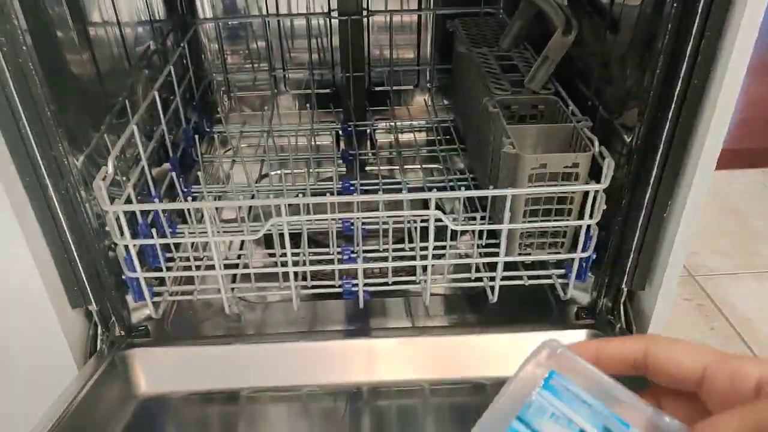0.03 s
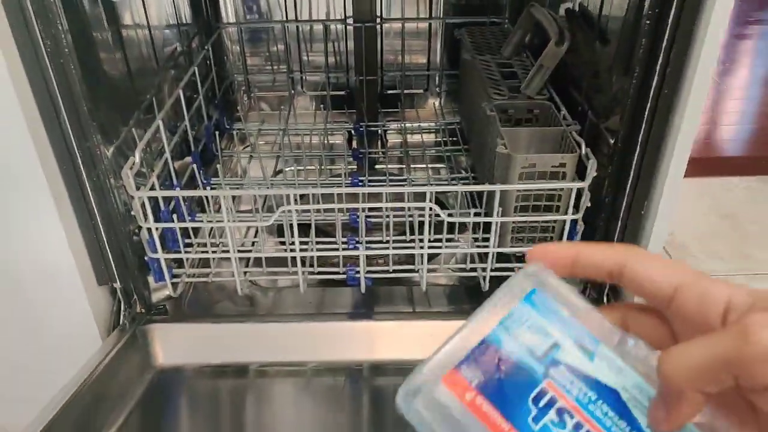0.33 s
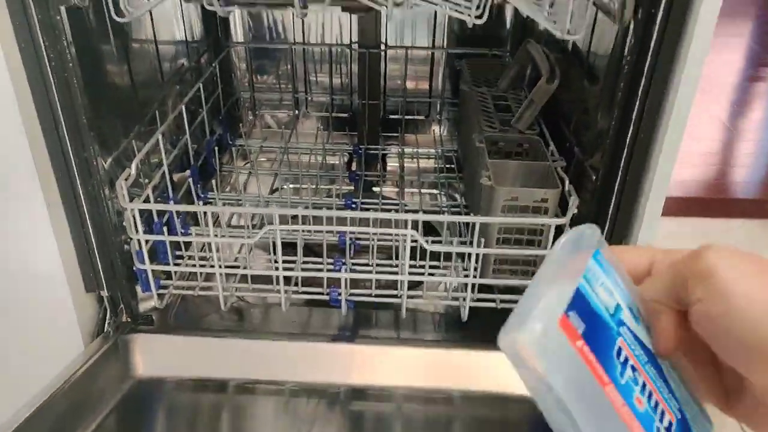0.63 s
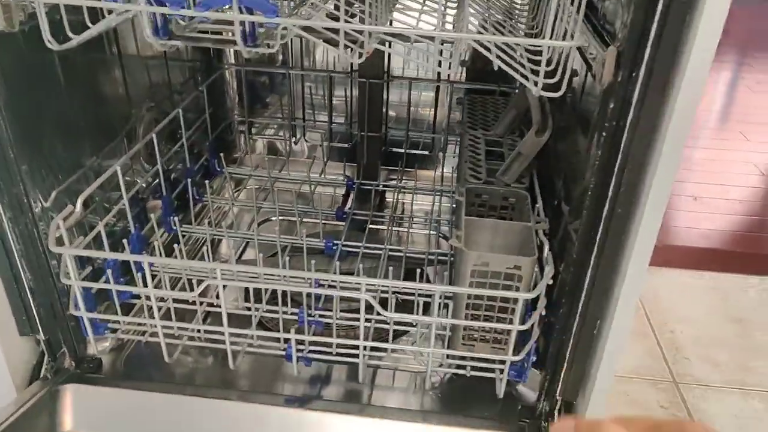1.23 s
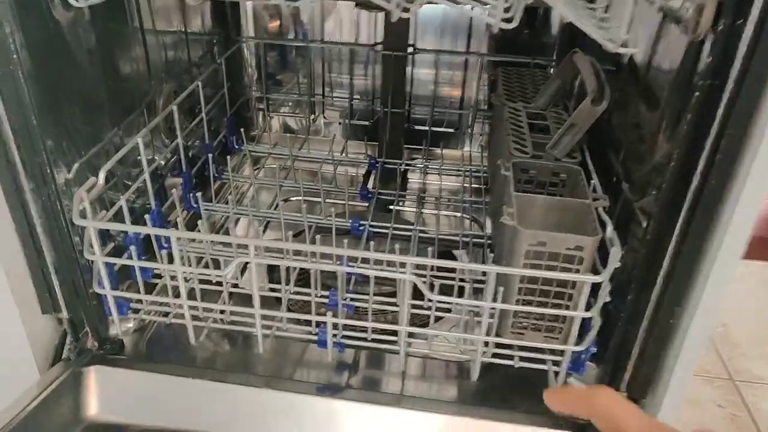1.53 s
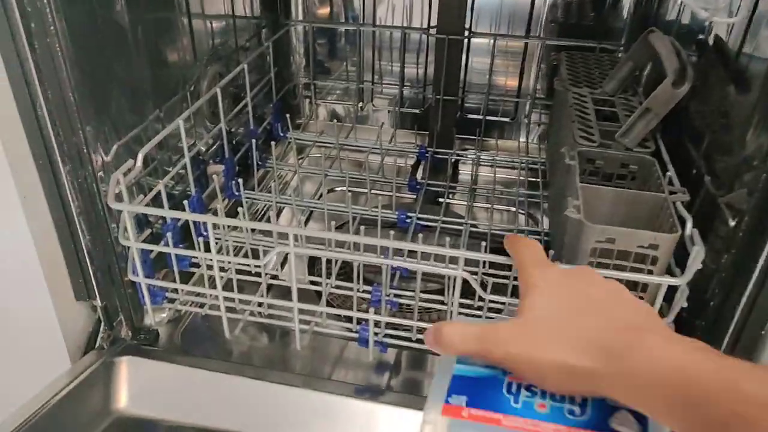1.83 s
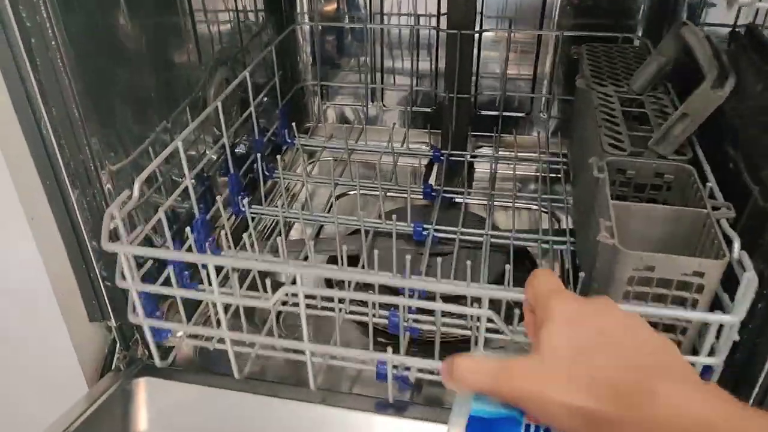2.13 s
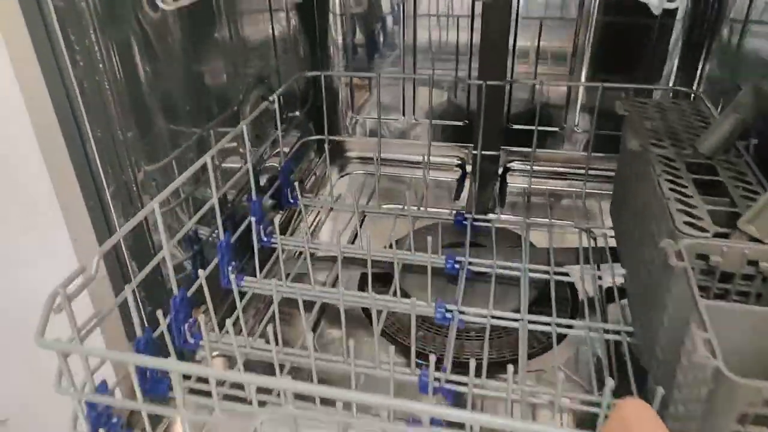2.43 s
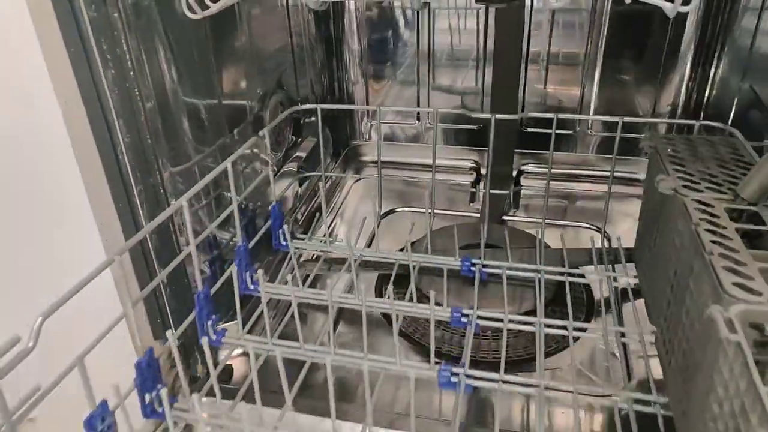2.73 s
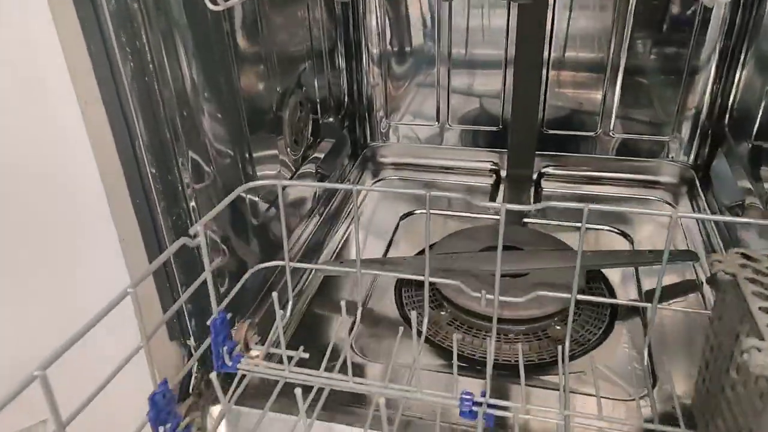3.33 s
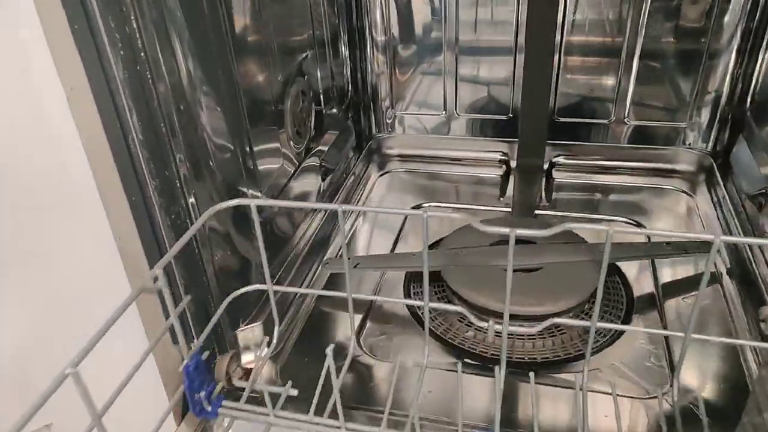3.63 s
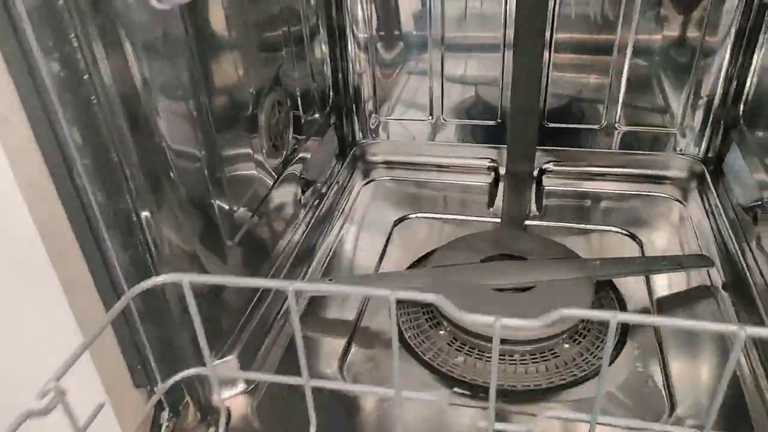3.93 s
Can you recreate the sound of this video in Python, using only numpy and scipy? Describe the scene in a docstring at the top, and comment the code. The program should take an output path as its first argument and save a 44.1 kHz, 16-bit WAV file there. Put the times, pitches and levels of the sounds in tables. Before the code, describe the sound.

A wire dishwasher rack is pulled out close by in a quiet kitchen. First come faint plastic box taps and swishing clothes, with a knee thumping the floor at about 1.2 seconds. From 2.1 seconds the rack rolls, clacking, jingling and booming against the tub. It eases to a low rumble, a wheel squeaks briefly at 3.1 seconds, and more rattling jolts follow until 4 seconds.

```python
"""A quiet kitchen, a stereo pair by the open dishwasher, most of the sound a little to the left.
Someone kneels: clothes swish, a plastic box is handled, a knee meets the floor. The empty wire rack
is then pulled out: its wheels rumble and squeak along the steel tub and bump onto the door, and
every jolt booms in the panels, clacks in the wheels and basket and sets the wires jingling."""
import sys
import numpy as np
from scipy import signal
from scipy.fft import irfft
from scipy.io import wavfile
from scipy.ndimage import uniform_filter1d

SR = 44100
rng = np.random.default_rng(int(sys.argv[2]) if len(sys.argv) > 2 else 0)


def bounce(signal):
    """Save signal as a 16-bit WAV file at the path given by the first command-line argument."""
    frames = np.transpose(np.atleast_2d(signal))
    limited = np.clip(frames, -1, 1)
    pcm = np.round(limited * 32767).astype(np.int16)
    wavfile.write(sys.argv[1], SR, pcm)


N = 176400
TIME = np.arange(N) / SR
WHEEL_COUNT = 4
# jolts of the rack: (time [s], panel boom [dB], plastic clack [dB], wire jingle [dB])
JOLTS = [(2.117, -56, -46, -54.5), (2.167, -44, -42, -47), (2.182, -34.5, -30, -46), (2.257, -53, -27, -35),
         (2.263, -26, -19, -24.5), (2.275, -31, -30, -42), (2.304, -33, -17, -33), (2.309, -22.5, -18, -35),
         (2.333, -36, -24, -30), (2.342, -27, -33.5, -37), (2.38, -27, -35, -44), (2.4, -29, -46, -37),
         (2.428, -27, -34.5, -41), (2.555, -36, -38.5, -68), (3.245, -59, -55, -44),
         (3.312, -33.5, -22, -35.5), (3.318, -40, -24, -37), (3.328, -23, -19.5, -30.5),
         (3.355, -21.5, -42, -47), (3.386, -38, -25, -38), (3.402, -27.5, -44, -30), (3.434, -49, -26, -48),
         (3.454, -28, -43, -33.5), (3.669, -25, -24.5, -36.5), (3.682, -25, -22, -29.5),
         (3.712, -38, -25.5, -35), (3.754, -26, -34, -41), (3.779, -22.5, -39, -29.5),
         (3.796, -39, -29, -24.5), (3.855, -42, -37, -30), (3.876, -28, -29.5, -36),
         (3.942, -33, -34.5, -27.5)]
# modes of the rack: (frequency [Hz], level [dB], t60 [s])
RACK_MODES = [(426, -10, 0.27), (645.7, 0, 0.23), (775, 0.5, 0.21), (1063, -0.5, 0.3), (1274, -4.5, 0.27),
              (1349, -3.5, 0.15), (1650, -3, 0.25), (1874, -1, 0.29), (2500, -2, 0.15)]


def from_db(db):
    """Decibels to gain."""
    return 10 ** (np.asarray(db) / 20)


def rms_one(x):
    """Scale to rms 1."""
    return x / np.sqrt(np.mean(x ** 2) + 1e-20)


def gains(rows):
    """Gain curves from rows of (time [s], level [dB], ...)."""
    times, *columns = np.transpose(rows)
    return [from_db(np.interp(TIME, times, db)) for db in columns]


def at_hz(points, hz):
    """Read a table on a log-frequency axis."""
    freqs, values = np.transpose(points)
    return np.interp(np.log(hz + 1e-9), np.log(freqs), values)


def place(a, b, hz):
    """Two unrelated signals feed the microphone pair, alike in the bass and mostly leaning left."""
    # likeness of the two microphones: (frequency [Hz], correlation [-1..1])
    likeness = [(100, .98), (300, .92), (700, .45), (1400, -.05), (15000, 0)]
    # their balance: (frequency [Hz], left minus right [dB])
    balance = [(100, 2), (350, 0), (700, 3), (1400, 4.5), (4800, 6), (9000, -3), (15000, 1.5)]
    alike = np.clip(at_hz(likeness, hz), -.99, .99)
    lean = from_db(at_hz(balance, hz) / 2)
    mid, side = np.sqrt(1 + alike) * a, np.sqrt(1 - alike) * b
    return np.array([(mid + side) * lean, (mid - side) / lean])


def noise(colour):
    """Stereo noise of a given colour that falls away beyond its ends; rms 1."""
    hz = np.fft.rfftfreq(N, 1 / SR) + 1e-3
    skirts = 1 / (1 + (hz / colour[-1][0] / 2) ** 2) / (1 + (colour[0][0] / hz / 2) ** 2)
    a, b = np.exp(2j * np.pi * rng.random((2, len(hz))))
    return rms_one(irfft(place(a, b, hz) * from_db(at_hz(colour, hz)) * skirts, N))


def dying(t60):
    """One second of exponential decay."""
    return np.exp(-np.log(1000) * TIME[:SR] / max(t60, 1e-3))


def ringing(modes):
    """Modes as the two microphones hear them, each with a chance phase."""
    out = 0
    for hz, db, t60 in modes:
        turn = np.exp(2j * np.pi * rng.random())
        mics = place(turn, turn * 1j * rng.choice([-1, 1]), hz)
        out += from_db(db) * dying(t60) * np.real(mics[:, None] * np.exp(2j * np.pi * hz * TIME[:SR]))
    return out / np.sqrt(sum(from_db(db) ** 2 for _, db, _ in modes))


def body(colour, t60, tail_db, tail_t60):
    """Response to one click: crowded short resonances, then the echo of tub and kitchen."""
    wash = noise(colour)
    return wash[:, :SR] * dying(t60) + from_db(tail_db) * wash[:, SR:2 * SR] * dying(tail_t60)


def excite(drive, response):
    """Play a mono drive through a stereo response."""
    return signal.fftconvolve(drive[None], response, axes=1)[:, :N]


def blows(times, levels_db, chatter_s, chatter_db, count=8):
    """Each blow is one contact and a few weaker rebounds."""
    clicks = np.zeros(N + SR)
    for s, db, (late, size) in zip(times, levels_db, rng.random((len(times), 2, count))):
        clicks[int(s * SR)] += from_db(db)
        rebounds = from_db(db + chatter_db) * (2 * size - 1) * (1 - late)
        np.add.at(clicks, ((s + late * chatter_s) * SR).astype(int), rebounds)
    return clicks[:N]


def grains(responses, per_s, spread_db):
    """Random small contacts of uneven size, dealt among several like bodies; rms 1."""
    sizes = from_db(spread_db * np.minimum(rng.exponential(1, N), np.pi)) * rng.choice([-1, 1], N)
    clicks = sizes * (rng.random(N) < per_s / SR)
    dealt = rng.integers(len(responses), size=N)
    return rms_one(sum(excite(clicks * (dealt == k), response) for k, response in enumerate(responses)))


def room_tone():
    """The steady, low hush of the kitchen."""
    # spectrum of the room: (frequency [Hz], level [dB])
    colour = [(25, -11), (90, 0), (130, -9), (250, -2.5), (1000, -18), (2000, -17.5), (2700, -25),
              (4200, -24), (4700, -20.5), (6000, -33), (15000, -27)]
    return from_db(-63) * noise(colour)


def clothes():
    """Cloth slides over cloth in a few smooth swells; the moving body stirs the air."""
    # swishes: (time [s], level [dB], rise [s], fall [s])
    swishes = [(.36, -64.5, 0.07, 0.17), (1.001, -45, 0.03, .15), (1.13, -51, 0.22, 0.17),
               (1.8, -59, 0.16, 0.077)]
    # spectrum of rubbing cloth: (frequency [Hz], level [dB])
    cloth_colour = [(150, 0), (230, 2), (450, -10), (1200, -8.5), (2500, -4.5), (3600, 1.5), (4100, 0),
                    (4900, 4.5), (6200, -7), (9000, -9.5), (15000, -14)]
    # stirred air: (time [s], level [dB])
    stir = [(.65, -72), (.74, -45.5), (.9, -58.5), (1.18, -55.5), (1.27, -34), (1.65, -58)]
    air_colour = [(22, 4.5), (90, -13.5), (140, -22.5), (220, -18.5), (350, -31.5)]
    rub = sum(from_db(db) * np.exp(-.5 * ((TIME - s) / np.where(TIME < s, rise, fall)) ** 2)
              for s, db, rise, fall in swishes)
    return rub * noise(cloth_colour) + gains(stir)[0] * noise(air_colour)


def box_knocks():
    """The plastic box is nudged in the hand: soft touches swell and sound dull, clean knocks ring."""
    # knocks: (time [s], level [dB], softness [s], contact low-pass [Hz], hollow ring [dB])
    knocks = [(0.394, -53.5, 0.028, 2000, -20), (.666, -44.5, 0.012, 6050, -22),
              (0.774, -44, 0.085, 2000, -4), (0.849, -46.5, 0.0056, 1530, -1.5),
              (0.912, -39, 0.0042, 1490, 2), (1.098, -32.5, 0.062, 543, -14),
              (1.428, -38, 0.089, 1600, -22)]
    # spectrum of the box: (frequency [Hz], level [dB])
    colour = [(180, 0), (400, -1.5), (900, -4.5), (1850, -4.5), (2600, -8.5), (4800, -12.5), (6200, -20)]
    # its hollow modes: (frequency [Hz], level [dB], t60 [s])
    modes = [(650, 4.5, 0.094), (835, -11, 0.14), (1310, -14, 0.13), (1773, -1, 0.1)]
    out = 0
    for s, db, soft_s, top_hz, ring_db in knocks:
        shell = body(colour, t60=0.077, tail_db=-4, tail_t60=0.26) + from_db(ring_db) * ringing(modes)
        clicks = blows([s], [db], chatter_s=soft_s, chatter_db=-15)
        contact = signal.sosfilt(signal.butter(2, top_hz, fs=SR, output="sos"), clicks + 1e-18)
        out += excite(contact, shell * (1 - dying(soft_s)))
    return out


def knee():
    """The knee lands with one soft push that rings the low modes of the floor."""
    # modes of the floor: (frequency [Hz], level [dB], t60 [s])
    modes = [(24.06, -8.5, 0.61), (62, -9.5, 0.61), (85, -2, 0.29), (94, -3.5, 0.29), (177, -16.5, 0.67),
             (231, 3, 0.17)]
    land_s, contact_s = 1.213, 0.0067
    push = np.sin(np.pi * np.clip((TIME - land_s) / contact_s, 0, 1)) ** 2
    boards = sum(from_db(db) * dying(t60) * np.sin(2 * np.pi * hz * TIME[:SR]) for hz, db, t60 in modes)
    lean_left = from_db([[.8], [-.8]])
    return -from_db(-19) * excite(push / push.sum(), boards * lean_left)


def wheel_squeak():
    """A dry wheel sticks and slips on its axle, in a rough falling tone."""
    # course of the squeak: (time [s], pitch [Hz], level [dB])
    glide = [(3.111, 1231, -72), (3.138, 1164, -41), (3.157, 978, -57), (3.195, 615, -47)]
    # its harmonics, from the fundamental up: (level [dB])
    harmonics = [3, -4.5, -10, -8]
    times, hz, db = np.transpose(glide)
    roughness = rms_one(uniform_filter1d(rng.standard_normal(N), size=30))
    pitch = np.interp(TIME, times, hz) * (1 + 0.028 * roughness)
    phase = 2 * np.pi * np.cumsum(pitch) / SR
    tone = rms_one(sum(from_db(level) * np.sin(k * phase) for k, level in enumerate(harmonics, 1)))
    tone *= from_db(np.interp(TIME, times, db)) * (TIME > times[0]) * (TIME < times[-1])
    echo = rms_one(rng.standard_normal((2, SR)) * dying(0.3)) / np.sqrt(SR)
    return from_db(-4) * tone + from_db(-6) * excite(tone, echo)


def rack_rolling():
    """The wheels rumble and hiss on the steel, their axles chatter and the loose wires buzz."""
    # course of the roll: (time [s], wheel rumble [dB], axle grit [dB], wire buzz [dB])
    roll = [(2.14, -48.5, -51, -62), (2.3, -29.5, -38.5, -34.5), (2.44, -35, -41, -43),
            (2.52, -36.5, -44, -53.5), (2.68, -41, -55, -66), (3.125, -45.5, -54.5, -63.5),
            (3.145, -47, -48, -52), (3.3, -45, -53, -51), (3.44, -31, -41, -37), (3.58, -39, -57, -57),
            (3.66, -37, -48, -62), (3.8, -34, -50.5, -39.5), (4, -34, -46.5, -69)]
    # spectra of its four parts: (frequency [Hz], level [dB])
    rumble_colour = [(22, -4.5), (50, -0.5), (80, -1), (105, -3.5), (140, -24), (200, -7.5), (250, -15),
                     (335, -11.5), (420, -22.5), (600, -29)]
    hiss_colour = [(4000, 0), (15000, -2)]
    grit_colour = [(250, 0), (450, 3.5), (1150, 2.5), (1700, -7.5), (2500, -30), (4000, -51)]
    buzz_colour = [(1500, 1.5), (3400, -2.5), (4200, -2.5), (4900, 2.5), (6200, -15), (15000, -15)]
    rumble_gain, grit_gain, buzz_gain = gains(roll)
    axles = [body(grit_colour, t60=0.011, tail_db=-17, tail_t60=0.4)
             + from_db(-23.5) * ringing(RACK_MODES) for _ in range(WHEEL_COUNT)]
    wires = [body(buzz_colour, t60=0.02, tail_db=-15.5, tail_t60=0.99) for _ in range(WHEEL_COUNT)]
    wheels = rumble_gain * noise(rumble_colour) + from_db(-69) * noise(hiss_colour)
    grit = grit_gain * grains(axles, per_s=400, spread_db=2.8)
    buzz = buzz_gain * grains(wires, per_s=1500, spread_db=2.2)
    moving = np.clip((TIME - JOLTS[0][0]) / 0.083, 0, 1)  # fades in from the first jolt
    return moving * (wheels + grit + buzz)


def tub_knocks():
    """The rack bumps the hollow tub with a soft contact."""
    # bumps: (time [s], level [dB])
    bumps = [(2.095, -41.5), (2.217, -22.5), (3.329, -28.5), (3.681, -22), (3.725, -21), (3.754, -26),
             (3.786, -22), (3.88, -28)]
    # spectrum of the tub: (frequency [Hz], level [dB])
    colour = [(160, -43), (200, 0.5), (330, -1.5), (420, -13.5), (650, -13.5), (1200, -36)]
    times, db = np.transpose(bumps)
    contacts = blows(times, db, chatter_s=0.01306, chatter_db=-12)
    tub = body(colour, t60=0.074, tail_db=-19.5, tail_t60=0.64)
    return excite(contacts, tub * (1 - dying(0.016)))


def tine_pings():
    """Each shaken tine rings briefly at its own pitch and stirs a tight cluster of neighbouring modes."""
    # pings: (time [s], pitch [Hz], level [dB])
    pings = [(2.26, 4740, -26.5), (2.353, 4800, -30), (3.399, 4670, -32.5), (3.453, 5150, -37.5),
             (3.670, 5030, -31.5), (3.781, 3980, -27.5), (3.796, 3043, -25.5), (3.799, 3830, -23.5),
             (3.798, 6900, -38), (3.856, 4650, -30), (3.942, 3515, -27), (3.948, 4380, -27)]
    log_step, t60 = 0.075, .06
    peak = [(-3, -28), (-1, -12), (0, 0), (1, -12), (3, -28)]  # (offset [steps], level [dB])
    out = 0
    for s, hz, db in pings:
        colour = [(hz * np.exp(k * log_step), level) for k, level in peak]
        tine = from_db(-5) * ringing([(hz, 0, t60)])
        cluster = from_db(-2) * body(colour, t60, tail_db=-12, tail_t60=0.44)
        click = from_db(db) * (np.arange(N) == int(s * SR))
        out += excite(click, tine + cluster)
    return out


def rack_jolts():
    """The wheels take turns to drop over edges: panels boom, plastic clacks, wires jingle."""
    # spectra of panels, plastic and wires: (frequency [Hz], level [dB])
    boom_colour = [(22, 10.5), (45, 4), (75, -5), (105, 5.5), (135, -27), (190, 0), (260, -11), (340, -7.5),
                   (450, -11.5), (900, -51)]
    clack_colour = [(200, -56), (450, -10.5), (750, -0.5), (1100, -3), (1900, 1.5), (2500, -7),
                    (3500, -14.5), (6000, -26.5)]
    jingle_colour = [(900, -16), (1700, 4), (2500, 2.5), (3500, 5.5), (4150, -7), (4900, 2), (6000, -9),
                     (7500, -7.5), (10000, -17.5), (15500, -25)]
    # modes of panels and wires: (frequency [Hz], level [dB], t60 [s])
    panel_modes = [(73.9, 7, 0.56), (98.6, 8.5, 0.37), (193, 6.5, 0.27), (337.7, 1.5, 0.25)]
    wire_modes = [(3544, 3, 0.14), (4380, 0.5, 0.09), (4580, 1, 0.19), (5360, 4, 0.07), (6900, -11.5, 0.34)]
    out = 0
    for wheel in range(WHEEL_COUNT):  # each wheel has its own response
        times, boom_db, clack_db, jingle_db = np.transpose(JOLTS[wheel::WHEEL_COUNT])
        panel = body(boom_colour, t60=0.087, tail_db=-15, tail_t60=0.52)
        panel += from_db(-9.5) * ringing(panel_modes)
        panel *= 1 - dying(0.019)  # softens the attack
        plastic = body(clack_colour, t60=.04, tail_db=-15, tail_t60=.38)
        plastic += from_db(-16) * ringing(RACK_MODES)
        plastic *= 1 - dying(.003)
        wires = body(jingle_colour, t60=.06, tail_db=-12, tail_t60=.34)
        wires += from_db(-11) * ringing(wire_modes)
        boom = excite(blows(times, boom_db, chatter_s=0.0151, chatter_db=-18), panel)
        clack = excite(blows(times, clack_db, chatter_s=.015, chatter_db=-2), plastic)
        jingle = excite(blows(times, jingle_db, chatter_s=.015, chatter_db=-1.5, count=16), wires)
        out += from_db(2.5) * boom + clack + from_db(-2.5) * jingle
    return out


def scene():
    """The rack and the person kneeling at it, over the quiet of the kitchen."""
    rack = rack_jolts() + tine_pings() + tub_knocks() + rack_rolling() + wheel_squeak()
    return rack + clothes() + knee() + box_knocks() + room_tone()


def record(dry):
    """The microphone feed loses its lowest rumble and its very top."""
    low_cut = signal.butter(2, 18, "high", fs=SR, output="sos")
    high_cut = signal.ellip(10, .2, 80, 15700, fs=SR, output="sos")
    return signal.sosfilt(high_cut, signal.sosfilt(low_cut, dry))


dry = scene()
out = record(dry)
bounce(out)
```